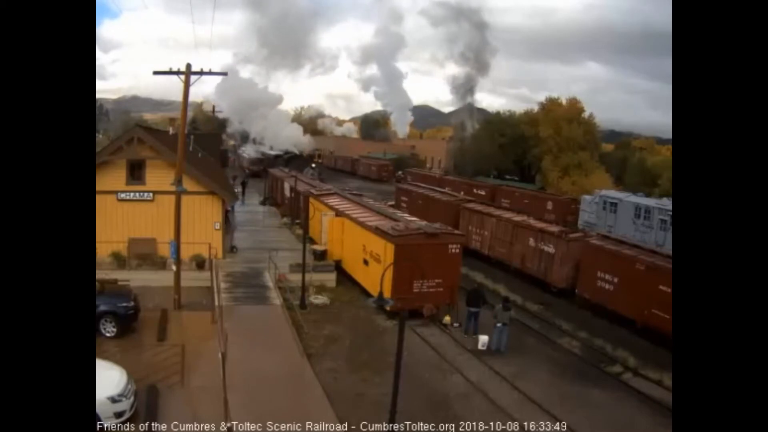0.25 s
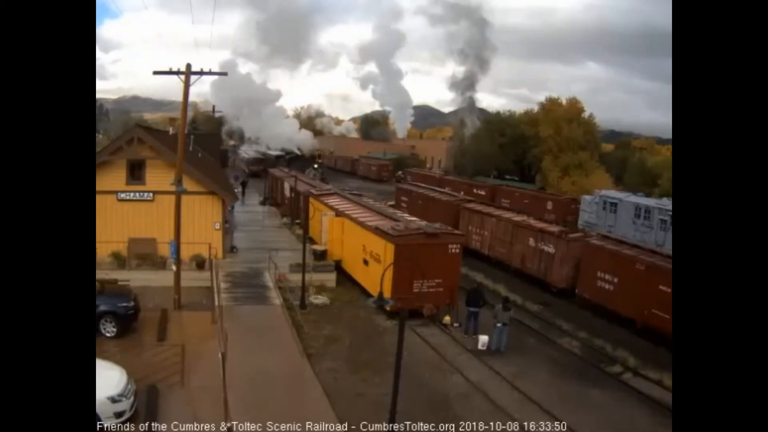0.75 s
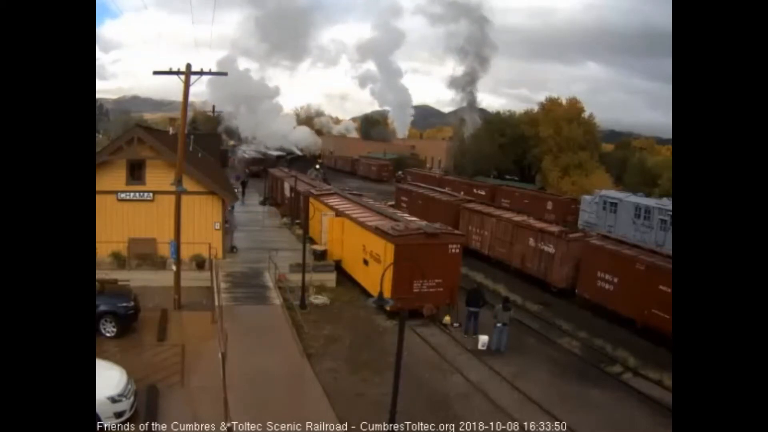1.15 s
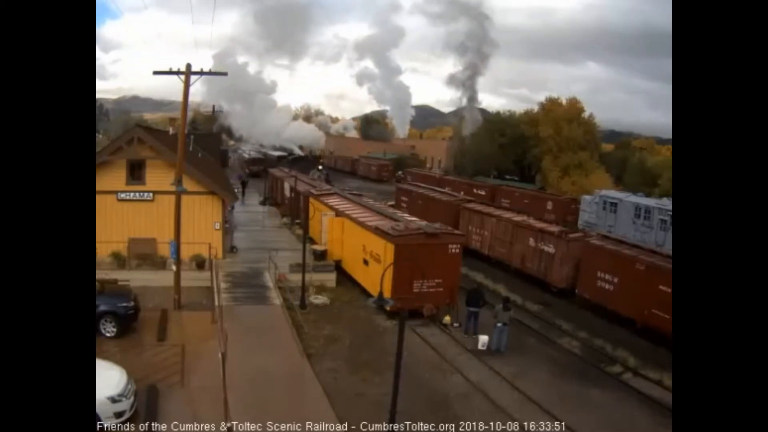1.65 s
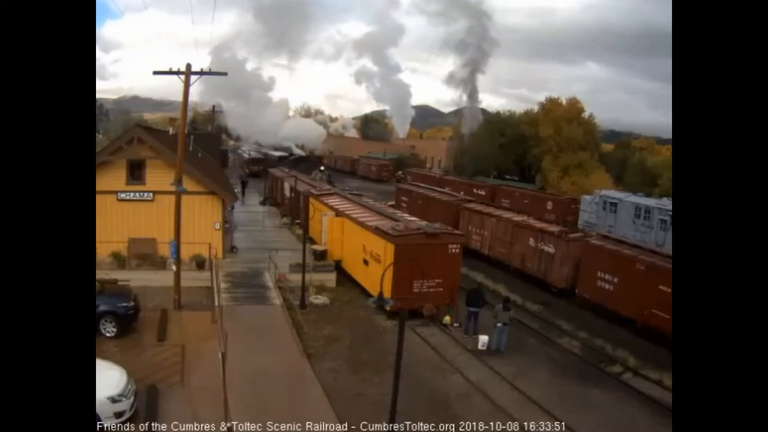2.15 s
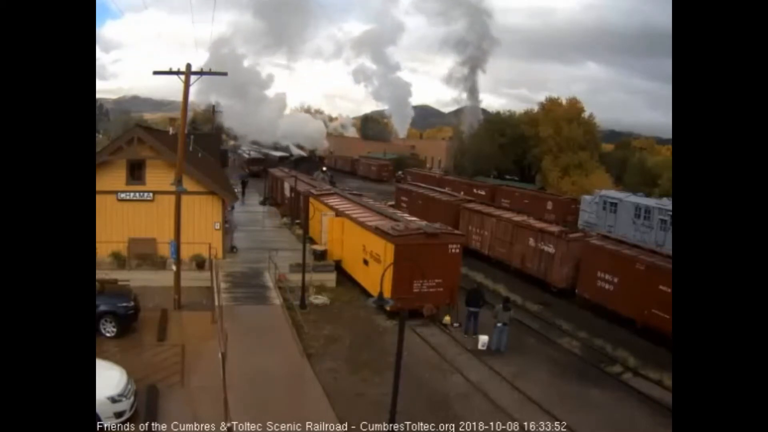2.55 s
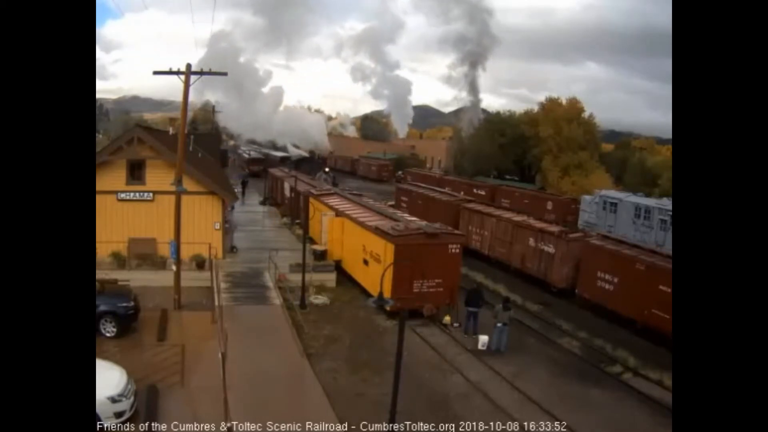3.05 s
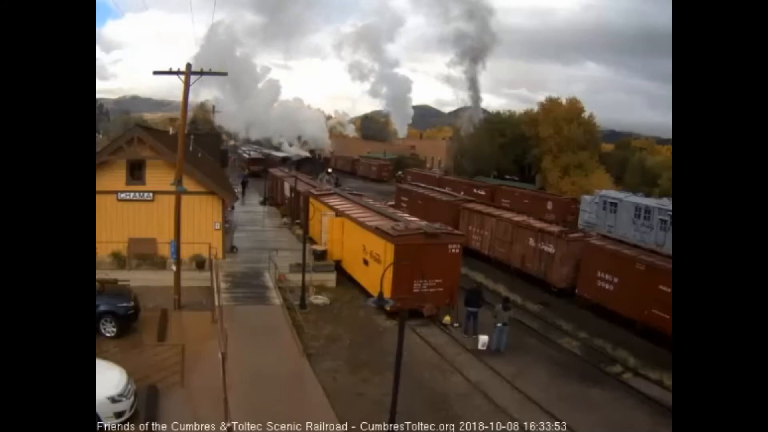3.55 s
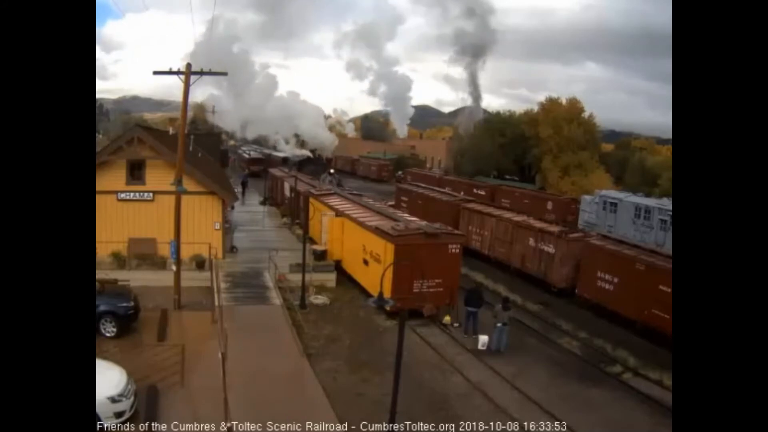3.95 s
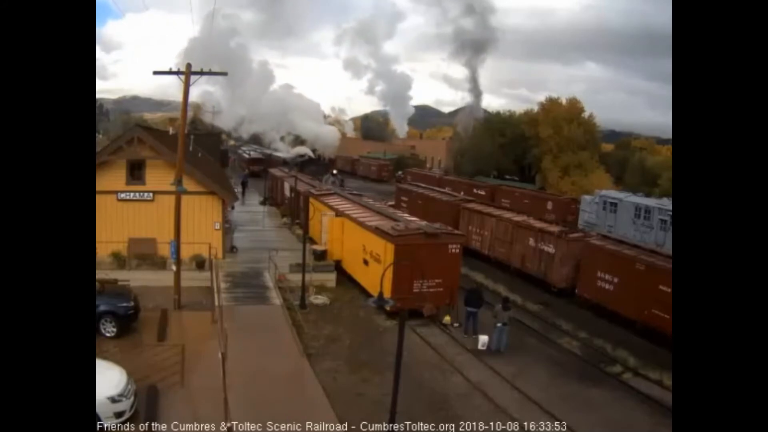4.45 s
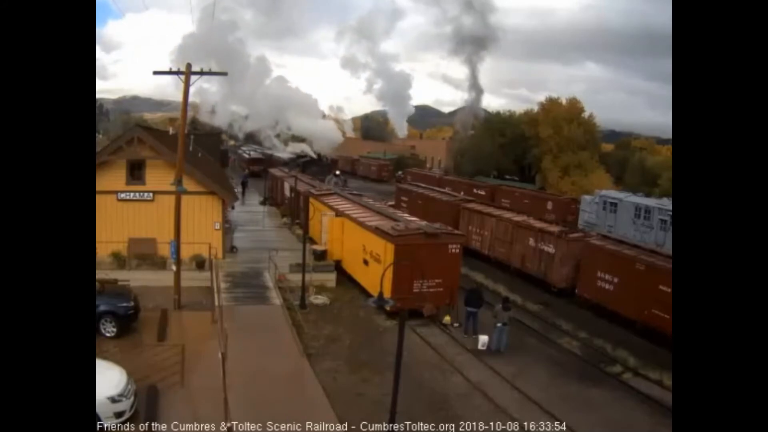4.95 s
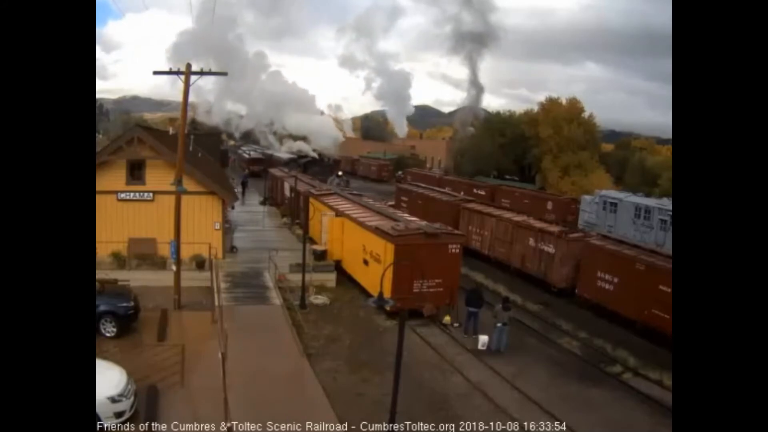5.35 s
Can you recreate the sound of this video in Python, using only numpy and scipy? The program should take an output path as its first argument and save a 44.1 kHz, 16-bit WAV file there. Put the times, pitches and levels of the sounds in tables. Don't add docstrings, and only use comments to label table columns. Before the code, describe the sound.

A steady, smooth hiss of venting steam across a rail yard, swelling slightly then easing off, over a very faint low rumble and hum.

```python
import sys
import numpy as np
from scipy import signal
from scipy.fft import rfft, irfft
from scipy.io import wavfile
from scipy.ndimage import uniform_filter1d

SR = 44100
rng = np.random.default_rng(int(sys.argv[2]) if len(sys.argv) > 2 else 0)


def file_out(sig):
    cols = np.atleast_2d(sig).T
    lim = np.clip(cols, -1, 1)
    pcm = np.round(lim * 32767).astype(np.int16)
    wavfile.write(sys.argv[1], SR, pcm)


def gain_from_db(level_db):
    decades = np.asarray(level_db, float) / 20
    return 10 ** decades


N = 246519


def rms_one(x):
    return x / np.sqrt(np.mean(x ** 2) + 1e-20)


def in_time(rows):
    s, *columns = np.transpose(rows)
    return [np.interp(np.arange(N) / SR, s, c) for c in columns]


def coloured(x, gain_db):
    hz = np.maximum(np.arange(N // 2 + 1) * SR / N, 1)
    return irfft(rfft(x) * gain_from_db(gain_db(hz)), N)


def spectrum(points):
    at_hz, level_db = np.transpose(points)
    return lambda hz: np.interp(np.log(hz), np.log(at_hz), level_db)


def noise(points):
    return rms_one(coloured(rng.standard_normal(N), spectrum(points)))


def split(x, low_hz, high_hz):
    lows = coloured(x, lambda hz: -10 * np.log10(1 + (hz / low_hz) ** 12))
    highs = coloured(x, lambda hz: -10 * np.log10(1 + (high_hz / hz) ** 12))
    return lows, x - lows - highs, highs


def drift(rate_hz):
    return rms_one(coloured(rng.standard_normal(N), lambda hz: -20 * np.log10(1 + (hz / rate_hz) ** 2)))


def swells(rows, faint_db):
    drop_at_one_width_db = 8.5
    s, *peaks_db, width_s = np.transpose(rows)
    t = np.arange(0, N + 64, 64) / SR
    drop_db = drop_at_one_width_db * ((t - s[:, None]) / width_s[:, None]) ** 2
    levels_db = []
    for peak_db in peaks_db:
        power = gain_from_db(faint_db) ** 2 + np.sum(gain_from_db(peak_db[:, None] - drop_db) ** 2, axis=0)
        levels_db.append(np.interp(np.arange(N) / SR, t, 10 * np.log10(power)))
    return levels_db


def tone(hz, level_db, waver_hz, waver_db):
    phase = 2 * np.pi * np.cumsum(hz + waver_hz * drift(6.7)) / SR
    return np.sqrt(2) * gain_from_db(level_db + waver_db * drift(9.9)) * np.sin(phase)


# f/Hz, level/dB per Hz
RUMBLE_SPECTRUM = [(12, -40), (20, -8), (59, 1.5), (114, -10), (166, -4), (325, -3), (515, -8), (634, -4.5),
                   (698, 1), (792, -14), (900, 0.5), (1170, -32.5), (1980, -120)]


def yard_rumble():
    peak_db, peak_s, fall_db_per_s = -70.5, 2.6, 0.98
    level_db = peak_db - fall_db_per_s * abs(np.arange(N) / SR - peak_s)
    return gain_from_db(level_db + 6.0 + 1.8 * drift(5)) * noise(RUMBLE_SPECTRUM)


# t/s, peak level/dB, width/s
GUSTS = [
    (.75, -73, 0.37),
    (1.35, -74, 0.24),
    (1.8, -69, .22),
    (3.0, -71.5, .4),
    (3.6, -74, 0.4),
    (4.6, -78, 0.31),
    (5.4, -77.5, 1),
]


def wind():
    calm_db = -85.5
    level_db, = swells(GUSTS, calm_db)
    return gain_from_db(level_db + 1.5 * drift(7)) * noise([(10, -15.5), (30, -3), (50, -15.0), (90, -42.0)])


# t/s, second order level/dB, third order level/dB, width/s
GENERATOR_SWELLS = [
    (0.0, -79.5, -80.5, 0.49),
    (1.6, -73, -84, 0.77),
    (3.1, -70.5, -80, 0.52),
    (4.0, -73, -73, 0.64),
    (4.9, -74.5, -74, 0.57),
]


def generator():
    shaft_hz, first_order_db, faint_db = 85.15, -88, -85
    levels_db = [first_order_db, *swells(GENERATOR_SWELLS, faint_db)]
    return sum(tone(order * shaft_hz, db, 1.2, 1.8) for order, db in enumerate(levels_db, start=1))


# t/s, peak level/dB, width/s
HUM_SWELLS = [
    (1.3, -76.5, 1.2),
    (2.4, -80.5, 0.55),
    (3.6, -78.5, 0.32),
    (4.5, -78.5, 0.84),
    (5.59, -77, 0.77),
]


def motor():
    start_hz, climb_hz_per_s, ease_hz_per_s2, faint_db = 58.3, 2.9, .23, -91.5
    t = np.arange(N) / SR
    hz = start_hz + climb_hz_per_s * t - ease_hz_per_s2 * t ** 2
    return tone(hz, swells(HUM_SWELLS, faint_db)[0], 2.5, 3.0)


# t/s, peak level/dB, width/s
WHINE_SWELLS = [(.05, -67, 0.24), (.58, -71.5, .13), (.95, -69.5, .3), (1.45, -76, 0.13), (1.85, -71, 0.19),
                (2.22, -67.5, 0.15), (2.68, -78, .15), (3.36, -73, .13), (3.68, -72, 0.29),
                (4.0, -70, 0.13), (4.33, -69, 0.23), (4.75, -64, .26), (5.56, -69, .17)]


def turbine():
    blade_hz, faint_db = 699.9, -81
    return tone(blade_hz, swells(WHINE_SWELLS, faint_db)[0], 1.6, 2.2)


# t/s, level/dB
STEAM_FLOW = [(0.0, -35.5), (.2, -34), (.5, -34), (.85, -31.5), (1.0, -31.5), (1.25, -29.5), (1.56, -32.5),
              (1.98, -31), (2.56, -33.5), (3.08, -31), (3.55, -36), (3.76, -34.5), (4.22, -38),
              (4.66, -37.5), (4.95, -38), (5.25, -41), (5.47, -39), (5.59, -37.5)]
# f/Hz, level/dB per Hz
HISS_SPECTRUM = [(800, -36.3), (950, -28.3), (1300, -21.2), (1800, -15.4), (2150, -11.8), (2400, 0.0),
                 (3000, -5.9), (3650, -9.0), (3900, -17.0), (4350, -21.0), (4600, -28.8), (5200, -37.0),
                 (6500, -46.6), (7100, -55.2)]


def jet():
    mean_flow_db = -31
    low_follows, high_follows = 0.62, 0.51
    flow_db, = in_time(STEAM_FLOW)
    swing_db = flow_db - mean_flow_db
    hiss = noise([(400, -55), *HISS_SPECTRUM, (7400, -55)])
    lows, core, highs = split(hiss, 2100, 4800)
    low_db = -.2 + (low_follows - 1) * swing_db
    high_db = 0.46 + (high_follows - 1) * swing_db
    flanks = gain_from_db(low_db + .5 * drift(22)) * lows + gain_from_db(high_db + .5 * drift(6.1)) * highs
    return gain_from_db(flow_db + 2.0 + 0.32 * drift(18)) * (core + flanks)


def scene():
    sound = yard_rumble() + wind() + generator() + motor() + turbine() + jet()
    return np.array([sound, sound])


# f/Hz, width/Hz, level/dB
RESPONSE_BUMPS = [(1043, 26, 3.6), (1108, 27, 2.8), (1187, 48, 6.3), (1304, 26, -3.3), (1386, 98, -4.6),
                  (1530, 21, 3.5), (1600, 40, 7.5), (1673, 35, 5.2), (1754, 76, -4.0), (1888, 41, 2.2),
                  (2137, 136, -5.0), (2214, 94, 2.6), (2310, 49, -5.9), (2387, 43, -8.3), (2490, 33, -6.9),
                  (2599, 27, 2.2), (2663, 21, -5.0), (2718, 106, -6.5), (2747, 18, -3.6), (2898, 94, 4.3),
                  (3067, 30, -2.2), (3159, 50, -3.4), (3201, 33, 4.2), (3359, 18, -3.5), (3466, 35, -2.8),
                  (3535, 23, 4.1), (3610, 38, 4.7), (3734, 38, -3.6), (3855, 68, -3.3), (4127, 23, 3.0),
                  (4560, 220, -2.5), (4930, 130, 1.5), (5400, 600, -1.3), (6070, 100, -2.5), (6730, 130, 2.5),
               (7020, 150, 5), (7175, 60, -4), (7290, 90, 7)]
# delay/ms, signed gain/1
REFLECTIONS = [(2.948, -0.053), (4.193, -0.051), (12.149, -0.036), (12.413, -0.042), (12.973, -0.05),
               (16.772, -0.039), (17.842, -0.03), (21.366, 0.027)]


def whole_response(hz):
    response_db = 0
    for at_hz, width_hz, db in RESPONSE_BUMPS:
        response_db = response_db + db * np.exp(-np.log(16) * ((hz - at_hz) / width_hz) ** 2)
    for ms, gain in REFLECTIONS:
        response_db = response_db + 20 * np.log10(abs(1 + gain * np.exp(-2j * np.pi * hz * ms / 1000)))
    return response_db


PARTINGS = [.41, .86, 1.22, 1.27, 1.40, 1.51, 2.12, 2.21, 3.03, 3.10]


def uneven():
    level_db, length_s = -57.0, .03
    t = np.arange(N) / SR
    gate = sum(np.cos(np.pi * np.clip((t - s) / (2 * length_s), -.5, .5)) ** 2 for s in PARTINGS)
    return gain_from_db(level_db) * gate * noise([(2250, -80), (2450, -3), (2800, 0), (3100, 0), (3200, -80)])


# t/s, low band level/dB, high band level/dB
SHORTAGES = [(0.271, -5, -5), (0.408, -4, 0), (0.443, -1, -3), (0.573, -4, -7), (0.616, -2, -7),
             (0.658, -1, -4), (0.705, 0, -7), (0.92, 0, -6), (0.99, -8, -13), (1.071, 0, -6),
             (1.234, -8, -6), (1.537, -9, -1), (1.582, -7, -6), (1.942, -7, -2), (2.006, -5, -8),
             (2.133, 0, -5), (2.262, 0, -20), (2.393, 0, -5), (2.544, -4, -4), (2.665, 0, -6),
             (2.749, -8, -4), (3.182, -7, -1), (3.238, -10, -10), (3.858, -2, -7), (4.035, 0, -7),
             (4.2, 0, -5), (4.271, -2, -5), (4.989, -3, -7), (5.331, -1, -4), (5.414, 0, -9)]
SPARED_BAND = (4700, 5050)


def starve(x):
    length_s, top_db, bass_db = .045, 1.5, 3.0
    hz, t, lines = signal.stft(x, SR, "hann", nperseg=1536, noverlap=1024)
    bass = hz[:, None] < 1500
    top = hz[:, None] > 6700
    flank = abs(hz[:, None] - 2900) > 1200

    s, low_db, high_db = np.transpose(SHORTAGES)
    lasting = length_s * (1 - high_db[:, None] / 30)
    frames = np.cos(np.pi * np.clip((t - s[:, None]) / lasting, -.5, .5)) ** 2
    loss_db = np.where(bass, low_db @ frames, high_db @ frames)
    need = np.sqrt(-loss_db)

    band, frame = (hz // 172).astype(int), (t * SR // 1024).astype(int)
    chance = rng.standard_normal((band.max() + 2, frame.max() + 1))
    chance_db = 2.5 * (chance[-1] + chance[band])[:, frame]

    usual = uniform_filter1d(uniform_filter1d(abs(lines), size=60, axis=1), size=9, axis=0)
    faint = usual[np.searchsorted(hz, 7000)]
    limit = faint * gain_from_db(np.where(bass, bass_db, top_db) + np.where(top, 3, 7.5) * need + chance_db)
    flank_limit = usual * gain_from_db(np.minimum(6 * need - 10, 3) + chance_db)
    limit = np.maximum(limit, (flank & ~top) * flank_limit)

    size = np.where(top, uniform_filter1d(abs(lines), size=5, axis=0), abs(lines))
    remains = np.where(top, 0, gain_from_db(1.4 * loss_db - 3))
    kept = np.clip((size / limit - 1) * 4, remains, 1)
    kept[(hz > SPARED_BAND[0]) & (hz < SPARED_BAND[1])] = 1
    return signal.istft(lines * kept, SR, "hann", nperseg=1536, noverlap=1024)[1][:N]


def top_cut(x):
    return signal.sosfilt(signal.butter(12, 7330, fs=SR, output="sos"), x)


def record(dry):
    mono = starve(gain_from_db(-1.42) * coloured(dry[0], whole_response))
    mix = mono + uneven() * [[1], [-1]]
    return top_cut(mix)


dry = scene()
out = record(dry)
file_out(out)
```